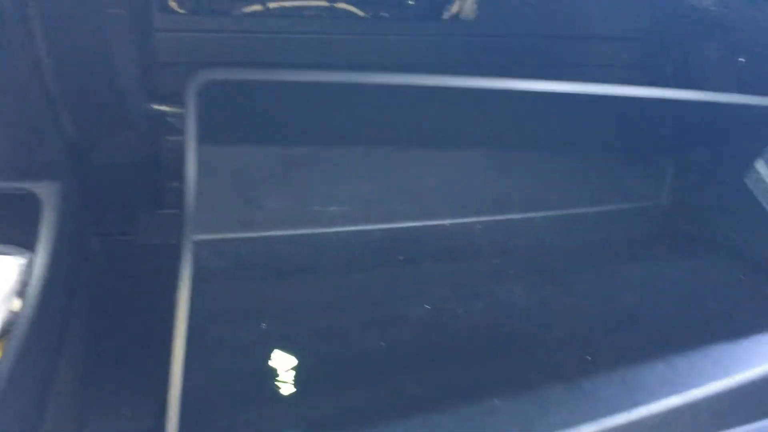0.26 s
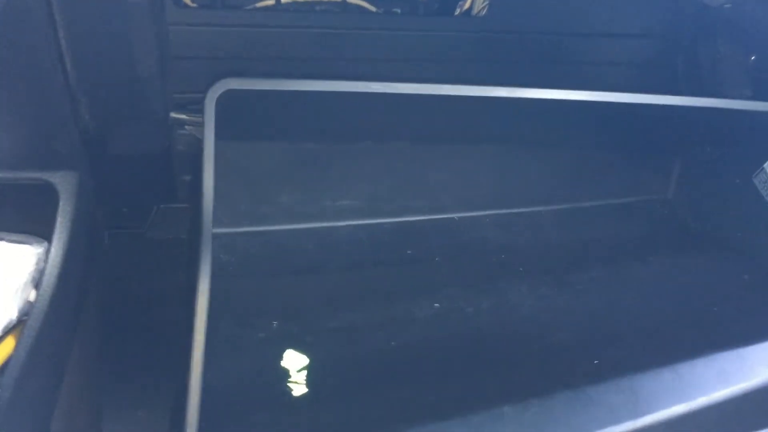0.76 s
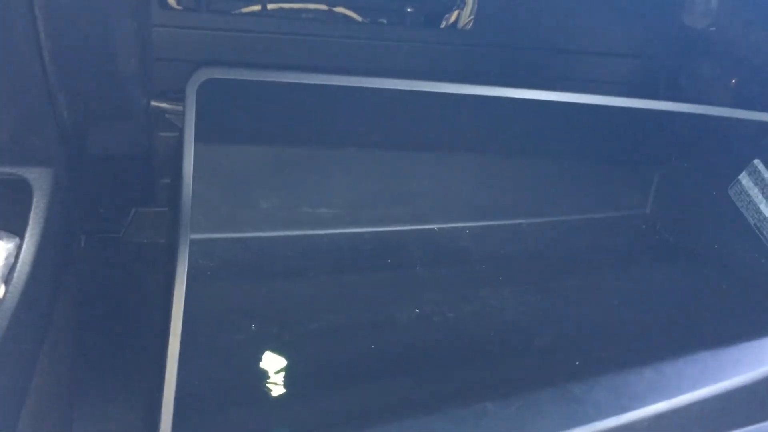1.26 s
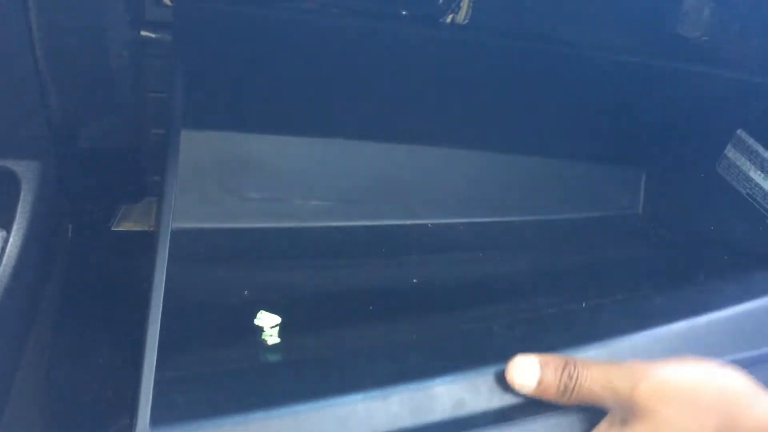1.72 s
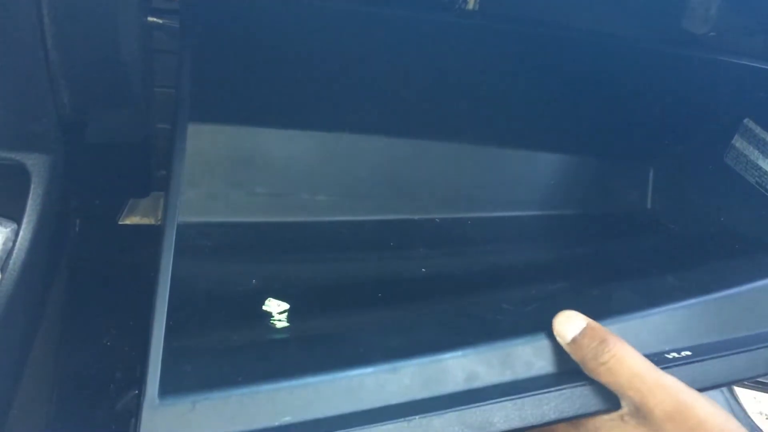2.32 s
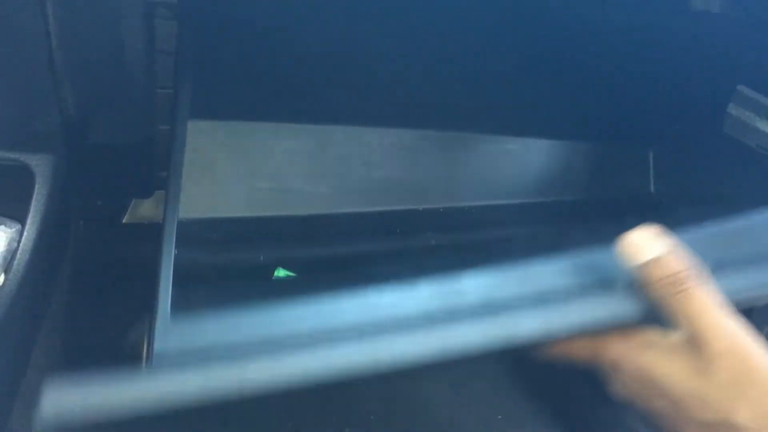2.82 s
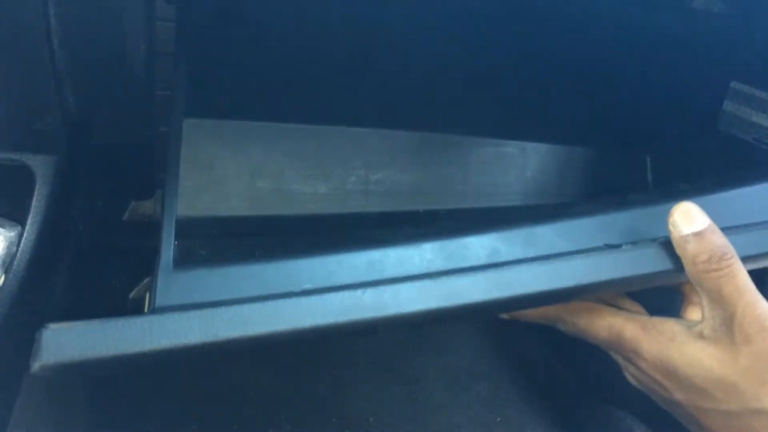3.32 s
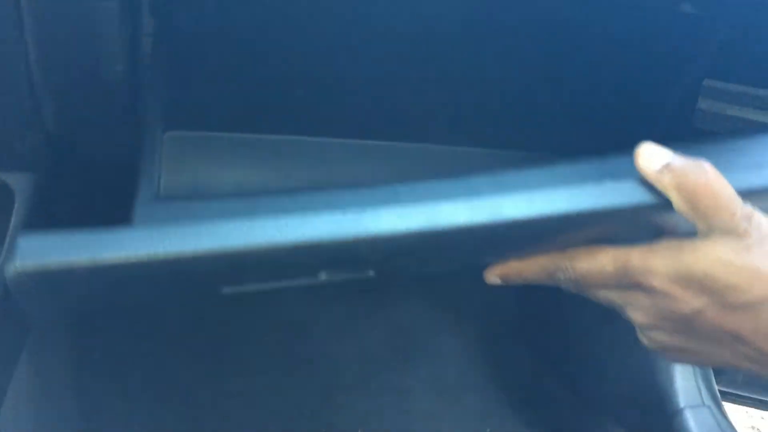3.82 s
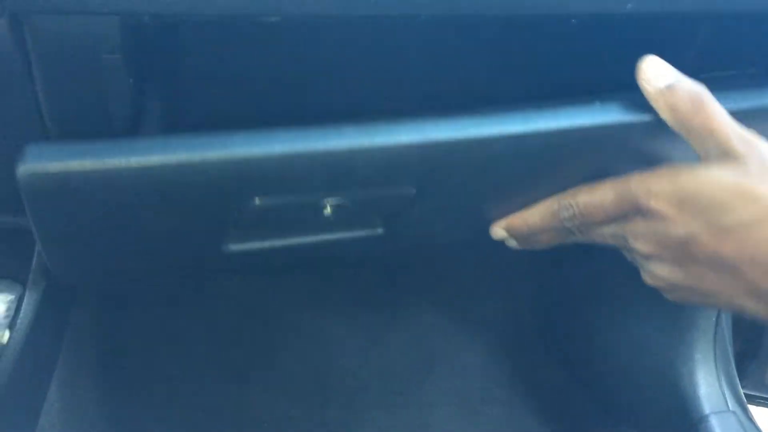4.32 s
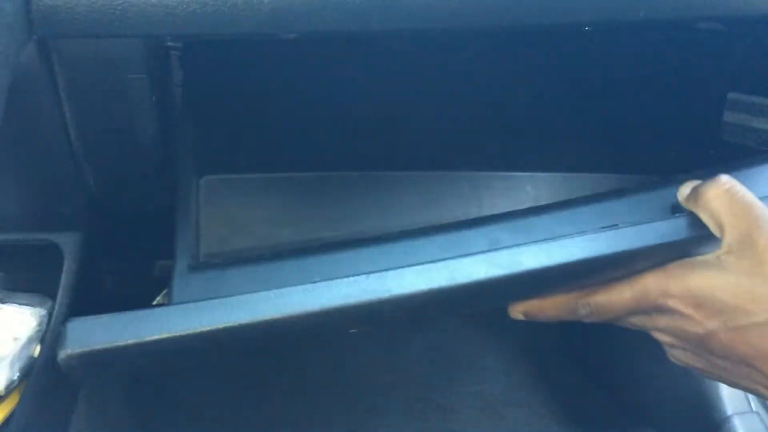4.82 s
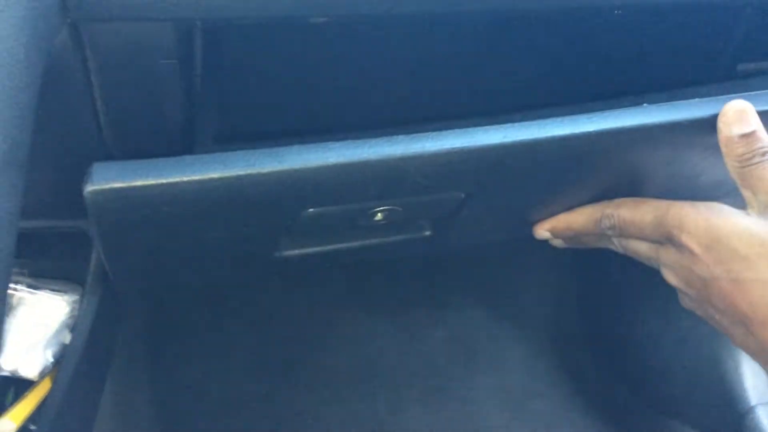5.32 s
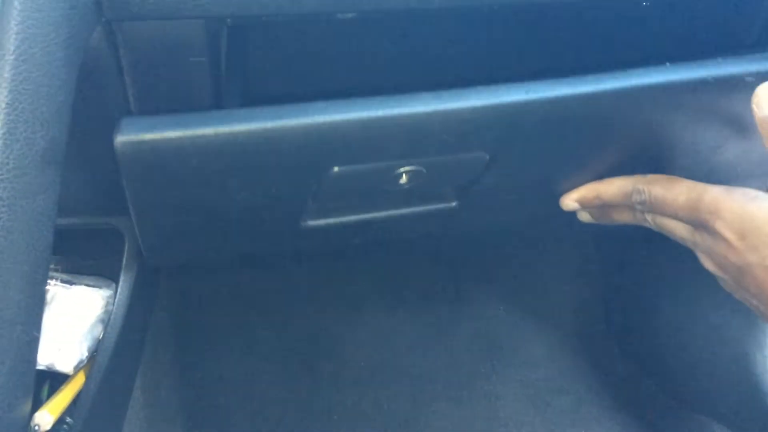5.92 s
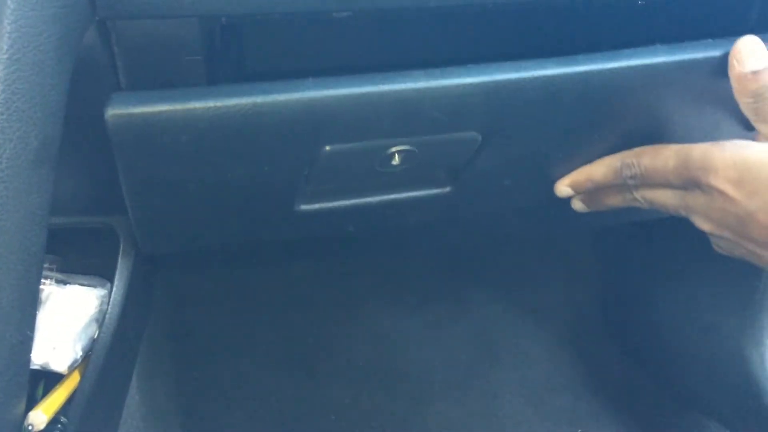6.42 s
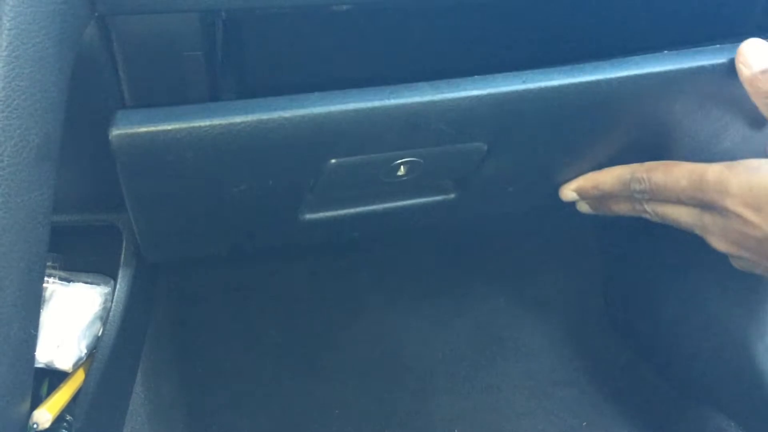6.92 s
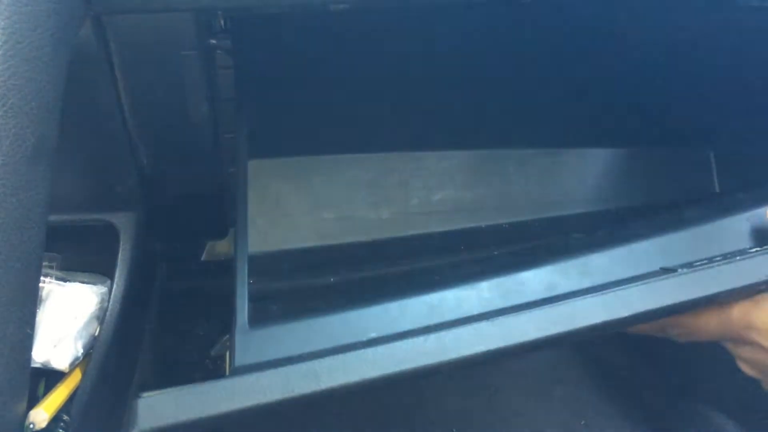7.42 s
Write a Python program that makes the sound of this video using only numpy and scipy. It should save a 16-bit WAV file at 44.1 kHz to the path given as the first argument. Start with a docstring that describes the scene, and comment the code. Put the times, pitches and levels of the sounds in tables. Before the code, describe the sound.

A plastic glove compartment is worked back onto its hinges with irregular hollow knocks, scuffs and a quick run of taps. A loud knock and a sharp snap come as it clips in. Lighter clicks and scrapes follow as it is swung up and down, then another sharp click, a brief latch rattle and a last knock. The sounds are close and dry inside a parked car, with faint traffic rumbling outside.

```python
"""Plastic glove box in a parked car.

The box is worked back onto its hinges and swung shut a few times. Knocks and scuffs ring its hollow,
lid, walls, ribs and edges. A loose stop taps the wall, a hinge clip snaps, the latch ratchets, edges
tick and scrape, fingers brush. Distant traffic rumbles through the padded cabin."""
import sys
import numpy as np
from scipy import signal
from scipy.io import wavfile
from scipy.ndimage import uniform_filter1d

SR = 44100
rng = np.random.default_rng(int(sys.argv[2]) if len(sys.argv) > 2 else 0)


def materialize(psi):
    """Save the field psi as 16-bit PCM at rate SR to the path in sys.argv[1].

    A 1-D psi becomes a single channel; in a 2-D psi each row is a channel.
    """
    bounded = np.clip(np.atleast_2d(psi).T, -1, 1)
    quanta = np.round(bounded * 32767).astype(np.int16)
    wavfile.write(sys.argv[1], SR, quanta)


N = 337786
EVENT_SAMPLES = 6000   # every contact is cut off after 136 ms

# resonances of the box parts: pitch_hz, gain_db, t60_s
HOLLOW_MODES = [(113, -12, 0.52), (147.5, 2, 0.17), (177.4, 4.5, 0.15), (192.3, -3.5, 0.19),
                (281, -2, 0.017)]
LID_MODES = [(290.4, 3, 0.024), (324, 3.5, 0.12), (359.2, 14, 0.089), (406.6, -2.5, 0.15), (491, 12, 0.037),
             (543.4, 5.5, 0.036), (622, 2, 0.12)]
WALL_MODES = [(695, -9, 0.032), (811, -9.5, 0.03), (903, 0.5, 0.031), (1092, -1, 0.028), (1257, 4, 0.016),
              (1298, 7, 0.012), (1462, 8.5, 0.0067), (1584, 1, 0.0095)]
RIB_MODES = [(1800, -1, .011), (2030, -2, .01), (2290, 0, .011), (2630, -2, .009), (3000, -3, .008),
             (3400, -5, .007), (3850, -6, .006), (4420, -7, .006), (4950, -8, .005), (5400, -9, .004)]
EDGE_MODES = [(6420, 0.5, 0.0013), (7530, 1.5, 0.001), (9050, -4.5, 0.00067), (11500, -7.5, 0.00053),
              (13800, -11, 0.00074)]


def from_db(db):
    """Decibels to gain."""
    return 10 ** (np.asarray(db) / 20)


def unit_rms(x):
    """Scale to rms 1."""
    return x / np.sqrt(np.mean(x ** 2) + 1e-20)


def curves(rows):
    """Interpolate rows of (time_s, values...) at every sample."""
    time_s, *columns = np.transpose(rows)
    return [np.interp(np.arange(N) / SR, time_s, column) for column in columns]


def butter(x, order, cutoff_hz, kind="low"):
    """Butterworth filter."""
    return signal.sosfilt(signal.butter(order, cutoff_hz, kind, fs=SR, output="sos"), x)


def place(start_s, sounds):
    """Mix each row in at its start time."""
    track = np.zeros(N + sounds.shape[1])
    for at_s, sound in zip(start_s, sounds):
        first = round(at_s * SR)
        track[first:first + len(sound)] += sound
    return track[:N]


def ring(force, pitch_hz, t60_s):
    """One damped resonance driven by a force."""
    radius = from_db(-60 / (max(t60_s, 0.001) * SR))
    angle = 2 * np.pi * pitch_hz / SR
    return signal.lfilter([0.5, 0, -0.5], [1, -2 * radius * np.cos(angle), radius ** 2], force + 1e-18)


def grit(count, spiky_db):
    """Uneven micro-impacts of either sign, one row per event."""
    draws = rng.random((count, 2, EVENT_SAMPLES))
    size = from_db(-spiky_db * np.log(draws[:, 0] + 0.00036))
    return size * np.sign(draws[:, 1] - 0.5)


def blow(chatter_s, spiky_db, rattle_db=-22):
    """Contact force: chatter rises fast and decays, loose parts rattle on."""
    t = np.arange(EVENT_SAMPLES) / SR
    attack = 1 - np.exp(-t / 0.0011)
    chatter = np.exp(-t / np.clip(chatter_s, 0.0003, 0.02)[:, None])
    rattle = from_db(rattle_db) * np.exp(-t / 0.016)
    return grit(len(chatter_s), spiky_db) * attack * (chatter + rattle)


def strike(forces, level_db, modes, spread_db, mode_ratio=-1, tilt_db_oct=0):
    """Ring a part to a peak short-term rms of level_db. Blows land apart, so mode gains scatter."""
    scatter_db = spread_db * rng.normal(0, 1, (len(forces), len(modes)))
    lowest_hz, highest_hz = modes[0][0], modes[-1][0]
    sound = 0
    for k, (pitch_hz, mode_db, t60_s) in enumerate(modes):
        mode = ring(forces, pitch_hz, t60_s)
        mode /= np.sqrt(np.sum(mode ** 2, axis=1, keepdims=True))
        gain_db = mode_db + tilt_db_oct * np.log2(pitch_hz / lowest_hz) + scatter_db[:, [k]]
        sound += mode_ratio ** k * from_db(gain_db) * mode
    # the part is too small to radiate slow forces, too heavy to follow fast ones
    sound = butter(sound, 3, [0.54 * lowest_hz, min(1.44 * highest_hz, 0.45 * SR)], "band")
    peak_rms = np.sqrt(uniform_filter1d(sound ** 2, size=200, axis=1).max(axis=1))
    return sound * (from_db(level_db) / peak_rms)[:, None]


def box(force, push, edge_db, strength_db, weight_db, sharp_db, wall_db_oct, lid_db_oct=0):
    """The push drives hollow and lid (one way for knocks, both ways for scuffs); the fine force drives walls,
    ribs and edges."""
    # heavy or firm contacts drum the lid more and ring the walls less
    drum_db = 3 + 0.37 * weight_db + 0.14 * np.clip(strength_db + 32.5, 0, 12)
    # sharp contacts favour the upper modes, as do very hard ones on the lid
    lid_db_oct = lid_db_oct + 0.85 * (sharp_db - 2.5) + 2.3 * np.maximum(strength_db + 9.5, 0)
    rib_db_oct = -1.5 + 0.26 * sharp_db
    hollow = strike(push, strength_db + weight_db, HOLLOW_MODES, spread_db=3.5, mode_ratio=1)
    lid = strike(push, strength_db + drum_db, LID_MODES,
                 spread_db=5.5, mode_ratio=1, tilt_db_oct=lid_db_oct[:, None])
    walls = strike(force, strength_db - drum_db, WALL_MODES,
                   spread_db=3, tilt_db_oct=wall_db_oct[:, None])
    ribs = strike(force, strength_db - 0.5 + sharp_db, RIB_MODES,
                  spread_db=3, tilt_db_oct=rib_db_oct[:, None])
    edges = strike(force, strength_db + edge_db + 1.24 * sharp_db, EDGE_MODES, spread_db=3)
    return hollow + lid + walls + ribs + edges


def cabin(x, t60_s=0.1, wet_db=-10):
    """Add the short tail of a padded cabin."""
    t = np.arange(SR // 4) / SR
    tail = rng.standard_normal(len(t)) * from_db(-60 * t / t60_s) * (t > 0.002)
    tail = butter(tail, 1, 16000)
    tail /= np.sqrt(np.sum(tail ** 2))
    return x + from_db(wet_db) * signal.fftconvolve(x, tail)[:N]


def traffic():
    """Road noise from outside, in half-octave bands; the rumble swells on its own."""
    # road noise spectrum: frequency_hz, relative_density_db
    spectrum = [(15, -36), (25, -34), (48, 10.5), (70, 8.5), (130, 3.5), (195, -4), (256, -9), (354, -11),
                (439, -19), (695, -9.5), (988, -7.5), (2910, -35), (11900, -46), (16000, -38)]
    # traffic swells: time_s, level_db, extra_rumble_db
    swells = [(0.0, -41, -1.5), (1.6, -41, -2.5), (3.11, -44.5, 1.5), (4.3, -40, 1.5), (4.9, -42, -2.5),
              (7.3, -40.5, 3), (7.66, -42, 1.5)]
    frequency_hz, density_db = np.transpose(spectrum)
    level_db, extra_rumble_db = curves(swells)
    white = rng.standard_normal((2, N))   # adjacent bands use independent noise
    edges_hz = 20 * 2 ** np.arange(0, 10, 0.5)
    road = np.zeros(N)
    for k, (low_hz, high_hz) in enumerate(zip(edges_hz, edges_hz[1:])):
        band_db = np.interp(np.log(low_hz * high_hz) / 2, np.log(frequency_hz), density_db)
        road += from_db(band_db) * butter(white[k % 2], 2, [low_hz, high_hz], "band")
    road = unit_rms(road)
    rumble = butter(road, 2, 220)
    return from_db(level_db) * (road + (from_db(extra_rumble_db) - 1) * rumble)


def scrape(slip_rate_hz=1500):
    """Edges rub as the box is handled: dense tiny slips ring it, the lid more than the body."""
    # rubbing levels: time_s, body_db, ribs_db
    rubbing = [(0.0, -60, -71), (0.68, -71.5, -69.5), (1.3, -88, -61.5), (1.6, -65.5, -62.5),
               (2.45, -60, -79), (3.28, -67.5, -68.5), (3.62, -57.5, -82), (4.3, -59, -80.5),
               (4.95, -67, -68), (5.4, -70, -62.5), (5.65, -64.5, -100.5), (7.34, -58.5, -91),
               (7.66, -67, -87)]
    body_db, ribs_db = curves(rubbing)
    slipping = rng.random(N) < slip_rate_hz / SR
    size_db = 2.2 * np.minimum(rng.exponential(1, N), 5)
    slips = slipping * from_db(size_db) * rng.choice([-1, 1], N)

    def rubbed(modes):
        return unit_rms(sum(from_db(db) * ring(slips, hz, t60_s) for hz, db, t60_s in modes))

    low = rubbed(HOLLOW_MODES + WALL_MODES) + from_db(4.5) * rubbed(LID_MODES)
    high = rubbed(RIB_MODES) + from_db(-16.5) * rubbed(EDGE_MODES)
    return from_db(body_db) * low + from_db(ribs_db) * high


def finger_brushes():
    """Fingers on grained plastic: airy hiss that rises quickly and fades."""
    # finger strokes: start_s, length_s, level_db
    strokes = [(1.181, 0.14, -59), (1.356, 0.035, -52), (1.534, 0.016, -47), (1.885, 0.034, -53),
               (2.785, 0.092, -61), (2.987, 0.047, -56.5), (3.048, 0.062, -55.5), (3.739, 0.14, -58),
               (4.114, 0.033, -62.5), (5.358, 0.03, -55), (6.107, 0.048, -50), (6.503, 0.035, -39),
               (7.201, 0.42, -60.5)]
    start_s, length_s, level_db = np.transpose(strokes)
    progress = np.minimum(np.arange(EVENT_SAMPLES) / SR / length_s[:, None], 1)
    envelope = np.sin(np.pi * progress ** 0.58)
    hiss = butter(grit(len(strokes), spiky_db=4), 1, [5100, 12500], "band")
    return place(start_s, from_db(level_db)[:, None] * unit_rms(hiss) * envelope)


def lid_nudges():
    """Soft pushes set only the lowest lid modes humming."""
    # pushes on the lid: start_s, level_db
    nudges = [(1.373, -43.5), (7.355, -35), (7.496, -43), (7.553, -40.5)]
    start_s, level_db = np.transpose(nudges)
    push = np.abs(blow(np.full(len(nudges), 0.008), spiky_db=1.5))
    return place(start_s, strike(push, level_db, LID_MODES[:4], spread_db=2.5, mode_ratio=1))


def edge_ticks():
    """Very short contacts ring the upper wall modes, ribs and edges."""
    # fine plastic contacts: start_s, level_db
    ticks = [(1.054, -44), (2.053, -46), (2.682, -46.5), (4.077, -47), (4.127, -50), (4.231, -46),
             (4.315, -41), (4.357, -43), (4.379, -50), (5.89, -44), (5.948, -35.5), (6.004, -41),
             (6.338, -43)]
    start_s, level_db = np.transpose(ticks)
    force = blow(np.full(len(ticks), 0.0012), spiky_db=5, rattle_db=-34.5)
    modes = WALL_MODES[3:] + RIB_MODES + EDGE_MODES
    return place(start_s, strike(force, level_db, modes, spread_db=3, tilt_db_oct=-9.5))


def scuffs(edge_db=-17.5):
    """Edge slides on edge; the pressure swells and eases."""
    # short slides: start_s, strength_db, weight_db, sharp_db, wall_db_oct, length_s
    slides = [(1.196, -39.5, 1.5, -7.5, -6, 0.029), (1.222, -38, 0, -7, -5, 0.028),
              (1.36, -55, -5, 6, -2, 0.013), (1.5, -33, 9.5, -15.5, -9, 0.053),
              (1.851, -28.5, 4.5, -14, 7, 0.032), (1.983, -40, 6, -27, -11, 0.017),
              (2.072, -30, 3, -13, 13, 0.031), (2.77, -43.5, 0, -11, -7, 0.084),
              (2.811, -35, 2, -8, -3, 0.11), (3.343, -48.5, -20, -6, 7, 0.07),
              (3.494, -41, 2.5, -0.5, 2, 0.037), (3.789, -40, 4, -6, -4, 0.051),
              (4.116, -38.5, -1, -11, -14, 0.065), (4.479, -48.5, 22.5, -15, -2, 0.11),
              (5.025, -42, -19, -11, -14, 0.084), (5.075, -43.5, 6, -9, 9, 0.058),
              (5.355, -49, -27, 0, -6, 0.018), (5.487, -41, 9.5, -4, -5, 0.062),
              (5.704, -39, 3, -12.5, 3, 0.033), (6.075, -45, -15, -12, -2, 0.032),
              (6.14, -31.5, 1, 0, -2, 0.015), (6.206, -37.5, 1.5, -3, 6, 0.04),
              (6.231, -40.5, -17, -2.5, 4, 0.022), (6.452, -33, 1.5, -10.5, 5, 0.071),
              (6.497, -34.5, -21, 7, 6, 0.016), (6.526, -39.5, 13, -4, -2, 0.056),
              (6.54, -29, -9, -7, 6, 0.015), (6.96, -28.5, -5.5, -9, -9, 0.035),
              (7.182, -30.5, -4.5, -13, -1, 0.04), (7.333, -51.5, 15, -17, -7, 0.039)]
    start_s, *voicing, length_s = np.transpose(slides)
    t = np.arange(EVENT_SAMPLES) / SR
    progress = np.minimum(t / np.clip(length_s, 0.008, 0.09)[:, None], 1)
    pressure = np.sin(np.pi * progress ** 0.67) ** 0.49
    force = grit(len(slides), spiky_db=2.5) * pressure
    return place(start_s, box(force, force, edge_db, *voicing))


def stop_taps(lid_lag_s=0.00425):
    """A loose stop taps the wall, which passes each clean blow on to the lid."""
    # blows of the stop: start_s, level_db
    taps = [(1.463, -23.5), (1.503, -22), (1.62, -26.5), (1.653, -27.5), (1.702, -21), (1.77, -23),
            (1.838, -32.5)]
    # resonances of the stop on the wall: pitch_hz, gain_db, t60_s
    stop_modes = [(559, -2, 0.013), (633, -1.5, 0.017), (860, -9, 0.01), (1200, -4, 0.0025),
                  (1460, -4, 0.022), (1880, -25, 0.0082), (2540, -22, 0.012), (3170, -30, 0.0019)]
    start_s, level_db = np.transpose(taps)
    push = np.abs(blow(np.full(len(taps), 0.0005), spiky_db=0.7, rattle_db=-32))
    passed_on = np.abs(blow(np.full(len(taps), 0.004), spiky_db=6.5))
    stop = strike(push, level_db, stop_modes, spread_db=2.5)
    lid = strike(passed_on, level_db - 6.5, LID_MODES, spread_db=2.5, mode_ratio=0.39, tilt_db_oct=-1)
    return place(start_s, stop) + place(start_s + lid_lag_s, lid)


def latch_ratchet():
    """The tongue ratchets over its catch; each tooth rings the latch and shakes the box."""
    # tooth contacts: start_s, level_db, chatter_s
    teeth = [(6.744, -17.5, .005), (6.76, -21, 0.01), (6.771, -19.5, 0.0074), (6.807, -23.5, 0.0046),
             (6.818, -37, 0.0026), (6.841, -25.5, 0.0022), (6.872, -34.5, 0.0027)]
    # latch resonances: pitch_hz, gain_db, t60_s
    latch_modes = [(634, 2.5, 0.036), (907, 0.1, 0.037), (1260, 4, 0.0094), (1600, -12, 0.017),
                   (1740, -8.5, 0.019), (2090, -4, 0.0094), (2360, -9.5, 0.012), (3010, -6.5, 0.018),
                   (3240, -19, .012), (4500, -24, .004)]
    start_s, level_db, chatter_s = np.transpose(teeth)
    force = blow(chatter_s, spiky_db=3.5, rattle_db=-42)
    latch = strike(force, level_db, latch_modes, spread_db=3.5)
    lid = strike(force, level_db - 11, LID_MODES, spread_db=2.5)
    hollow = strike(np.abs(force), level_db - 14.5, HOLLOW_MODES, spread_db=1, mode_ratio=0.74)
    return place(start_s, latch + lid + hollow)


def clip_snap(start_s=2.8655, level_db=-8):
    """The hinge clip springs home: one push on two clear modes."""
    # clip resonances: pitch_hz, gain_db, t60_s
    clip_modes = [(326, -3, .075), (568, 0, .065)]
    push = np.abs(blow(chatter_s=[0.002], spiky_db=1.5, rattle_db=-50))
    return place([start_s], strike(push, [level_db], clip_modes, spread_db=0))


def knocks(edge_db=-12.5):
    """Sharp contacts ring the whole box; a blow only pushes inward."""
    # knocks and snaps: start_s, strength_db, weight_db, sharp_db, wall_db_oct, lid_db_oct, chatter_s
    contacts = [(0.082, -32, -4.5, -4, -12, 10, 0.0031), (0.178, -25, -10, -15, -14, 4, 0.0033),
                (0.192, -32.5, 18, -15, 0, -24, 0.011), (0.213, -34.5, 10.5, -12.5, -5, -4, 0.0076),
                (0.568, -38, -6, -25, -19, 2, 0.0018), (0.589, -20.5, 6.5, -7, -8, -21, 0.002),
                (0.604, -23.5, 0, -14, -10, 13, 0.0048), (0.893, -21, 7, -13.5, 1, 1, 0.0015),
                (0.918, -34, 8, -7, -9, 24, 0.0024), (1.545, -22, 3, -8, 0, -10, 0.0047),
                (1.866, -24.5, -2.5, -11, 6, 20, 0.0036), (1.892, -34.5, 4, -8.5, -6, 7, 0.0049),
                (1.921, -35.5, 6.5, -22, -17, 10, 0.0054), (2.081, -28.5, -10, -2.5, 13, 11, 0.0039),
                (2.13, -37, 6, -10.5, -15, 8, 0.0061), (2.18, -39.5, 2, -25, -11, 5, 0.0071),
                (2.195, -36, 6.5, -31, -10, 22, 0.0069), (2.354, -33.5, 1.5, -16, -7, 3, 0.0031),
                (2.381, -25, -3.5, -6.5, 6, 7, 0.0056), (2.394, -26.5, -2, -6, -9, -4, 0.0088),
                (2.429, -32, -1, -3, 2, 10, 0.0022), (2.466, -34.5, 6, -7.5, 8, 13, 0.022),
                (2.485, -12, 5, -17, 4, -8, 0.0017), (2.489, -15.5, 8.5, -5, -14, 7, 0.0025),
                (2.516, -27.5, 2, -16, 4, -4, 0.021), (2.537, -34, 11, -2, 5, -11, 0.0096),
                (2.86, -17, -26, 0, 3, -6, 0.0022), (2.865, -19.5, -22, 2, 3, -12, 0.003),
                (2.883, -27, 7, -14, -5, -15, 0.003), (2.9, -38, 18.5, -23, 1, -16, 0.0059),
                (2.992, -41.5, -2.5, -4.5, 2, 3, 0.0021), (3.067, -44.5, -11, 3.5, 9, 22, 0.0052),
                (3.702, -24.5, -3, -11, 7, 9, 0.0038), (3.939, -52.5, 20.5, 1, -2, -4, 0.0023),
                (4.191, -34.5, 6, -10, -4, -6, 0.0089), (4.292, -37.5, -1, -3.5, 3, 1, 0.004),
                (4.33, -31.5, -1, -8.5, 2, -11, 0.0063), (4.479, -28, -4, -14.5, -4, -6, 0.0082),
                (4.5, -40, -9, -20, 1, 0.1, 0.0026), (4.525, -25.5, -15, 1, -1, -2, 0.0035),
                (4.876, -37.5, 3, -23, -30, 12, 0.0037), (5.015, -57.5, -1, 13, -2, 0.1, 0.0015),
                (5.415, -28.5, 1.5, -7.5, 7, -5, 0.0042), (5.434, -27.5, -3, -6, -3, 3, 0.0034),
                (5.454, -29, -7, -10.5, -5, -4, 0.017), (5.521, -26, 0, -5.5, -6, -2, 0.0021),
                (5.577, -39.5, 6, 0, 4, -11, 0.0061), (5.592, -31, -2, -1, 11, -3, 0.0034),
                (5.688, -36, 8.5, -7.5, 2, 5, 0.0021), (5.952, -32, 7, -4.5, -10, 0.5, 0.0057),
                (6.018, -35.5, 4, -9, -4, 1, 0.023), (6.0532, -14, -7, 0.5, -1, 9, 0.0028),
                (6.058, -18.5, 1, -7.5, 12, -17, 0.0021), (6.318, -41.5, 5, -9, 7, 0, 0.0021),
                (6.354, -36, 5, -6.5, 9, -11, 0.004), (6.518, -36.5, -37, 9.5, 12, 0.1, 0.0012),
                (6.559, -34, 8, -8, 0, 2, 0.0033), (6.735, -38.5, -18, 9.5, 0, -3, 0.012),
                (6.969, -44.5, 18, 17, -2, -5, 0.004), (7.235, -42, 12, -2.5, -2, 2, 0.012),
                (7.269, -24, -3, -18, -3, -2, 0.015), (7.28, -21.5, 10.5, -3.5, 4, -19, 0.0037),
                (7.318, -54, 31, 4, -2, -2, 0.0036)]
    start_s, *voicing, chatter_s = np.transpose(contacts)
    force = blow(chatter_s, spiky_db=3)
    push = -np.abs(force)
    return place(start_s, box(force, push, edge_db, *voicing))


def scene():
    """Box sounds in the cabin over traffic; scrape and traffic dip briefly once."""
    dip_s, dip_half_width_s, dip_db = 3.15, 0.035, -8
    t = np.arange(N) / SR
    dip = from_db(dip_db * np.exp(-((t - dip_s) / dip_half_width_s) ** 2))
    handling = (knocks() + scuffs() + stop_taps() + edge_ticks() + lid_nudges()
                + latch_ratchet() + clip_snap() + finger_brushes() + dip * scrape())
    return (cabin(handling) + dip * traffic())[None]


def record(dry):
    """Round the peaks, cut the top treble."""
    ceiling, stopband_hz = 1.1, 16450
    rounded = ceiling * np.tanh(dry / ceiling)
    return signal.sosfilt(signal.cheby2(14, 60, stopband_hz, fs=SR, output="sos"), rounded)


dry = scene()
out = record(dry)
materialize(out)
```